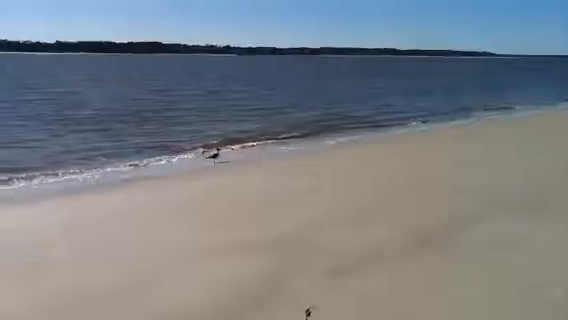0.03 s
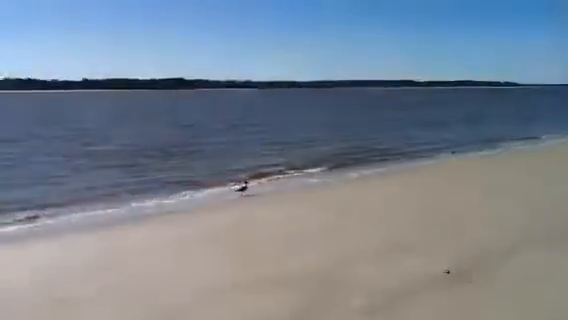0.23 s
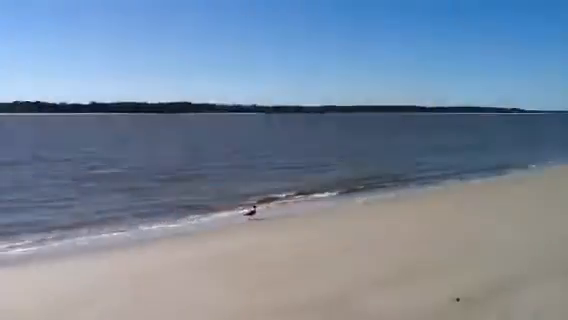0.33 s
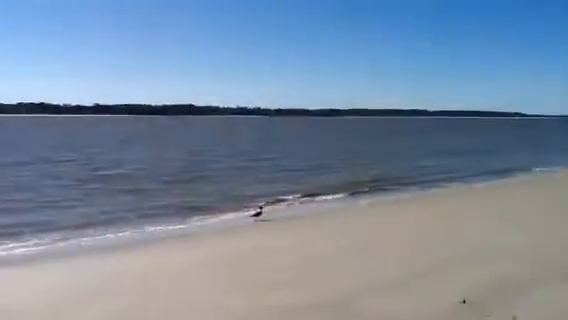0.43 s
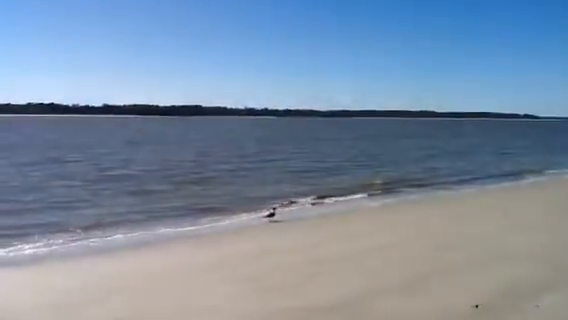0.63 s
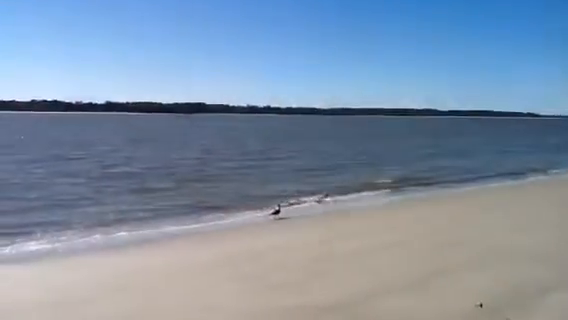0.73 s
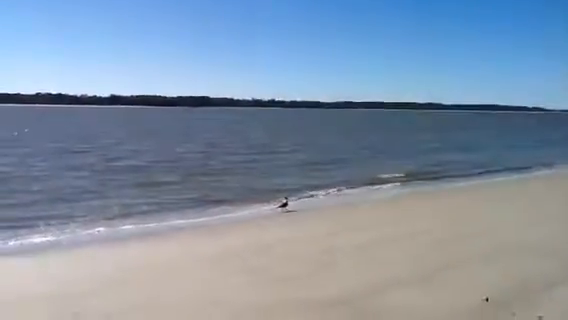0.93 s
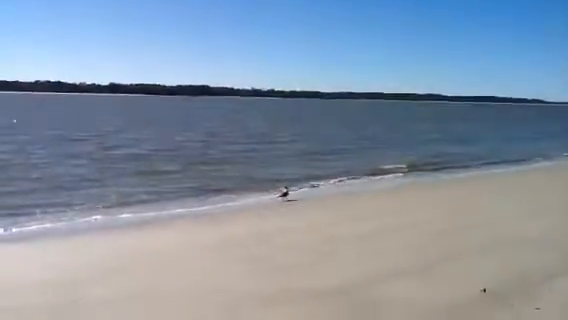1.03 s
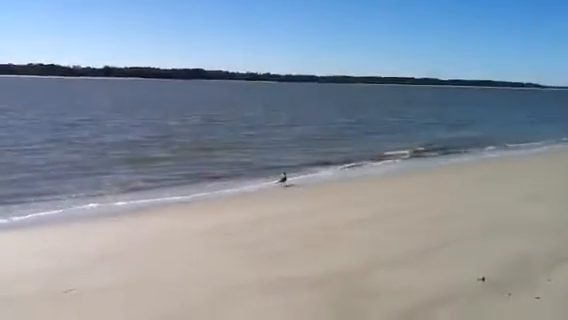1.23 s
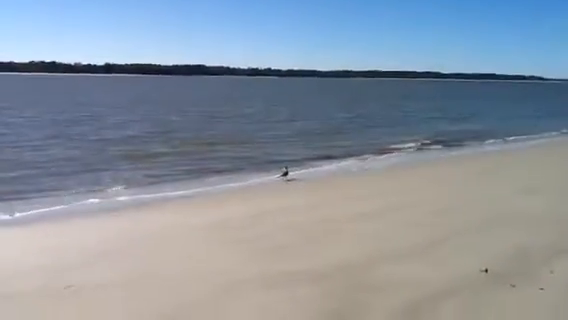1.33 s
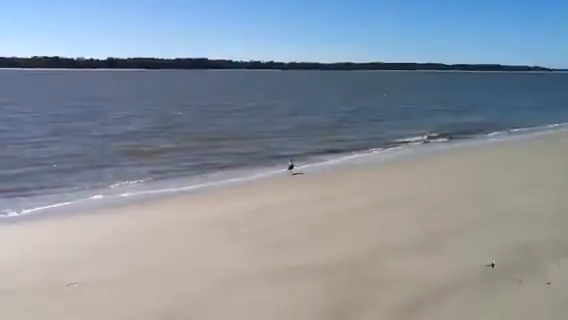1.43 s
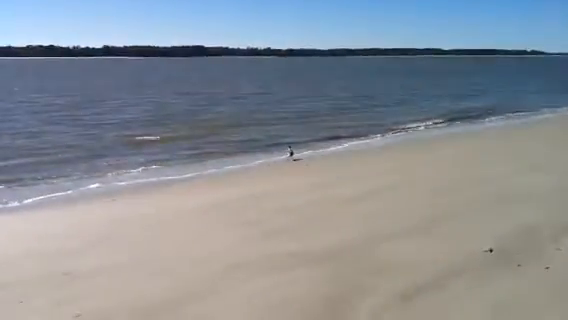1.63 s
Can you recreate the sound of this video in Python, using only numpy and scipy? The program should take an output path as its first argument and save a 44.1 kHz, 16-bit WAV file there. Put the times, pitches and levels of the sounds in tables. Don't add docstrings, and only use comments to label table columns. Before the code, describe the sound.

Wind buffets a handheld camera's microphone on an open beach: silence until 0.12 s, then loud, low, lumpy rumble, easing after 0.45 s and dropping around 0.8 s to weak puffs. Small surf hisses faintly throughout. A distant gull gives six short rising-falling calls from 0.5 s, about every quarter second, loudest at 1.7 s. Plastic ticks scatter throughout, with sharper cracks at 0.78 and 1.53 s.

```python
import sys
import numpy as np
from scipy import signal
from scipy.fft import rfft, irfft, next_fast_len
from scipy.io import wavfile
from scipy.ndimage import uniform_filter1d, map_coordinates

SR = 44100
rng = np.random.default_rng(int(sys.argv[2]) if len(sys.argv) > 2 else 0)


def store_wav(level_fs):
    pcm = np.round(np.clip(np.atleast_2d(level_fs), -1, 1) * 32767)
    wavfile.write(sys.argv[1], SR, pcm.T.astype(np.int16))


def linear_from_db(decibels):
    return 10 ** (np.asarray(decibels, float) / 20)


N = 74970


def unit(x):
    return x / np.sqrt(np.mean(x ** 2) + 1e-20)


def wobble(rate):
    return map_coordinates(rng.standard_normal(400), [np.arange(N) * rate / SR], mode="wrap")


def coloured(x, points):
    m = next_fast_len(N + 8192)
    hz, db = np.transpose(points)
    log_bins = np.log(np.fft.rfftfreq(m, 1 / SR) + 1)
    gain = linear_from_db(np.interp(log_bins, np.log(hz), db))
    return unit(irfft(rfft(x, m) * gain, m)[:N])


def grains(per_s, scatter_db):
    chance = rng.random(N)
    sign, size = rng.standard_normal((2, N))
    return (chance < per_s / SR) * sign * linear_from_db(scatter_db * size)


def even(x):
    span_s = .07
    power = uniform_filter1d(x ** 2, size=round(span_s * SR))
    power = uniform_filter1d(power, size=round(span_s * SR / 2))
    return x / np.sqrt(np.abs(power) + 1e-9)


def surf():
    # (frequency [Hz], level [dB per Hz])
    hiss_colour = [(250, -17), (500, 1), (1000, 2), (2000, -0.5), (3200, -8), (5000, -17), (8000, -23.5),
                   (15500, -31.5)]
    # (time [s], level [dB])
    swell = [(.12, 0.5), (.4, 0.5), (.65, 0), (.9, 0), (1.1, -1.5), (1.3, -1.5), (1.5, 0), (1.7, .5)]
    # (time [s], level over the hiss [dB], half length [s])
    wavelets = [
        (0.474, -18, 0.17),
        (.88, -18, 0.19),
    ]
    level_db, foam_per_s, foam_db, foam_hz = -45, 250, -69.5, 6060
    t = np.arange(N) / SR

    z = signal.stft(rng.standard_normal(N + 512), nperseg=512)[2]
    field = uniform_filter1d(rng.standard_normal(z.shape), size=8, axis=0)
    field = uniform_filter1d(field, size=10, axis=1)
    patchy = signal.istft(z * linear_from_db(1.04 * unit(field)), nperseg=512)[1][:N]
    hiss = coloured(patchy, hiss_colour)

    run_up = sum(linear_from_db(db) * np.exp(-((t - s) / half) ** 2) for s, db, half in wavelets)
    fizz_colour = [(2500, -28), (5000, -6), (7500, 3.5), (11000, -13), (15500, -8)]
    fizz = coloured(rng.standard_normal(N), fizz_colour)
    foam = coloured(grains(foam_per_s, 1.7), [(foam_hz / 4, -30), (foam_hz, 0), (15500, -8)])
    surf_level = linear_from_db(level_db + np.interp(t, *np.transpose(swell)))
    return surf_level * (hiss + run_up * fizz) + linear_from_db(foam_db) * foam


def gull():
    # (start [s], top [s], end [s], top pitch [Hz], level [dB])
    calls = [
        (.484, .548, .565, 898, -50),
        (.712, .797, .83, 1002, -51.5),
        (.955, 1.015, 1.056, 1032, -48),
        (1.163, 1.245, 1.288, 1024, -49.5),
        (1.392, 1.475, 1.538, 1028, -46),
        (1.656, 1.735, 1.8, 1015, -42),
    ]
    # (multiple of the pitch, level [dB])
    throat = [(1, -20), (2, 0), (3, -9.5), (4, -27), (5, -20), (6, -24)]
    facing = [-8, -5, -1, 4.5, -4, -10]
    rises = [.22, .15, .135, .145, .11, .085]
    falls = [.05, .12, .18, .22, .27, .26]
    attack_s, release_s, waver_share, flutter_db = .006, .008, .0015, .8
    swing, bend = 1.7, 2.2
    scoop, scoop_s = .06, .003
    close_db, push_db = -8, -1

    out, t = np.zeros(N), np.arange(N) / SR
    waver = waver_share * wobble(59.4)
    flutter = linear_from_db(flutter_db * np.array([wobble(40.5) for _ in throat]))
    for (s, top, end, hz, db), facing_db, rise, fall in zip(calls, facing, rises, falls):
        before = np.clip((top - t) / (top - s), 0, 1)
        after = np.clip((t - top) / (end - top), 0, 1)
        climb = rise * np.sin(np.pi / 2 * before) ** swing
        drop = fall * after ** bend
        slide = scoop * np.exp(-np.abs(t - s) / scoop_s)
        pitch = hz * (1 - climb - drop - slide + waver)
        phase = 2 * np.pi * np.cumsum(pitch) / SR
        beak_db = facing_db + close_db * (1 - before) ** 3
        voice = np.zeros(N)
        for (k, partial_db), partial_flutter in zip(throat, flutter):
            gain = linear_from_db(partial_db + beak_db * (k > 3.5))
            voice += gain * partial_flutter * np.sin(round(k) * phase)
        shape = np.clip((t - s) / attack_s, 0, 1) * np.clip((end - t) / release_s, 0, 1)
        out += linear_from_db(db + 0.5 + push_db * before) * shape * voice
    return out


def case_ticks():
    # (time [s], peak level [dB], centre [Hz], width [octaves])
    ticks = [(.1522, -42.5, 10400, 0.87), (.1635, -43, 7000, 1), (.1919, -44, 7000, 1),
             (.3702, -49, 8500, .8), (.387, -38, 4500, .35), (.387, -34, 8800, 1.2), (.4013, -42, 6100, .5),
             (.452, -39, 10200, .7), (0.53, -32.5, 2840, 0.34), (0.5307, -40, 5200, 0.89),
             (.5546, -41, 8950, 1.9), (.5926, -40, 4760, 0.42), (.5926, -49, 10500, .8),
             (.5985, -38, 2300, .4), (.6964, -41, 6300, .3), (.7396, -43, 6500, .45),
             (.7666, -52, 8000, .4), (0.7768, -33, 6430, 0.61), (.7788, -34, 2680, .9),
             (0.7828, -38, 6940, 0.45), (.849, -37, 8200, .7), (.8953, -34.5, 4100, 1.3),
             (.9162, -47, 9000, .9), (.9524, -47, 6000, 1.6), (1.0882, -38, 3800, 1.1),
             (1.1257, -49, 12500, .8), (1.1624, -47, 5860, .5), (1.1716, -44.5, 11500, .8),
             (1.224, -46, 8500, .7), (1.2367, -43, 4300, .45), (1.2367, -47, 10500, .7),
             (1.459, -46, 5000, .4), (1.5272, -30.5, 3620, 0.29), (1.5277, -34, 6200, 0.34),
             (1.5325, -30.5, 1730, 0.45), (1.5324, -33, 3600, 0.4), (1.591, -54, 6300, .9),
             (1.627, -54, 6800, .3), (1.665, -40.5, 4400, .4), (1.6652, -50, 8000, 1.2)]
    t60_s, onset_s = 0.0048, 0.00023
    out, t = np.zeros(N + 512), np.arange(512) / SR
    scatters = rng.standard_normal((len(ticks), 2, 11))
    for (s, db, hz, octaves), (detune, turn) in zip(ticks, scatters):
        modes_hz = hz * 2 ** (octaves * (np.linspace(-.62, .55, num=11) + 0.016 * detune))
        waves = np.sin(2 * np.pi * modes_hz[:, None] * t + 1.1 * turn[:, None])
        rings = (hz / modes_hz) @ waves
        decay = linear_from_db(-60 * t / t60_s * np.sqrt(hz / 6000))
        tick = rings * decay * (1 - np.exp(-t / onset_s))
        out[round(s * SR):][:512] += linear_from_db(db) * tick / np.abs(tick).max()
    return out[:N]


def case_crack():
    # (frequency [Hz], level [dB])
    shell = [(2300, -14), (3500, -6.5), (4400, -8), (5900, -1.5), (7600, 2), (8400, -3), (10500, -7),
             (13500, -16)]
    crack_s, crack_db, t60_s, onset_s = .7778, -29, .0075, 0.00014
    t = np.clip(np.arange(N) / SR - crack_s, 0, None)
    ring = np.zeros(N)
    for hz, db in shell:
        ring += linear_from_db(db - 60 * t / t60_s * hz / 6000) * np.sin(2 * np.pi * hz * t)
    return linear_from_db(crack_db) * (1 - np.exp(-t / onset_s)) * ring


def wind_puffs():
    # (centre [s], peak level [dB], frequency
    # [Hz])
    puff_table = [(0.125, -23, 610.0), (0.124, -16.5, 289.7), (0.163, -13, 180.8), (0.175, -19, 690.0),
                  (0.247, -18, 179.4), (0.262, -16.5, 230.0), (0.263, -26.0, 591), (0.287, -24, 230.0),
                  (0.314, -20, 220.0), (0.353, -20.5, 298.2), (0.355, -19, 160.0), (0.378, -25, 180.0),
                  (0.402, -22, 221.4), (0.44, -26.5, 544), (0.444, -20, 179), (0.527, -25.5, 242),
                  (0.575, -24, 289.4), (0.612, -33, 550.0), (0.623, -23.5, 241.4), (0.641, -22, 248.6),
                  (0.66, -30, 191), (0.678, -24.0, 270.0), (0.689, -34, 660.0), (0.718, -24, 270.0),
                  (0.735, -36, 513), (0.757, -34.5, 551), (0.758, -23.0, 199.6), (0.759, -47, 775),
                  (0.811, -26, 230.0), (0.925, -24.5, 190.0), (1.024, -25, 199.6), (1.048, -44, 530.0),
                  (1.114, -35.5, 299), (1.125, -37.5, 150.5), (1.141, -30.5, 150.0), (1.168, -39, 470.0),
                  (1.174, -35, 225), (1.183, -44, 435), (1.197, -41.5, 441.4), (1.203, -31.5, 220.8),
                  (1.224, -46.0, 690), (1.3, -36.5, 360.0), (1.305, -48, 867), (1.328, -48, 220.2),
                  (1.332, -45, 853), (1.356, -36.5, 436), (1.365, -28, 180.0), (1.391, -30, 180.0),
                  (1.445, -43.5, 560.0), (1.457, -32, 190.0), (1.493, -35.0, 200.0), (1.509, -42, 219.8),
                  (1.534, -50, 700.0), (1.544, -37, 150.2), (1.615, -37.5, 463), (1.614, -36.0, 280.0),
                  (1.621, -48, 890.0), (1.641, -35.5, 200.0), (1.654, -46.0, 744), (1.684, -35.5, 201.4),
                  (.232, -18, 280),
        (0.26, -21, 227),
        (.243, -23.5, 450),
        (.412, -20, 400),
        (.49, -33, 360),
        (0.36, -26.5, 480),
        (0.143, -20, 325),
        (0.24, -25, 330),
        (.398, -36, 1250),
        (.7, -31, 170),
    ]
    half_s, common_db = 0.0054, 1
    t = np.arange(N) / SR
    events = puff_table
    out = np.zeros(N)
    for (centre_s, db, hz), turn in zip(events, rng.random(len(events))):
        burst = np.exp(-((t - centre_s) / half_s) ** 2)
        out += linear_from_db(db + common_db) * burst * np.sin(2 * np.pi * (hz * t + turn))
    return out


def wind():
    # (time [s], strength [dB], extra turbulence at the port edge [dB])
    gust = [(.125, -23.5, 7), (.165, -19.5, 0), (.21, -22, 1), (.24, -19.5, 3), (.31, -24.5, 5),
            (.35, -22.5, -5), (.385, -23.5, 0.5), (0.404, -23.5, 7.5), (.425, -25, 2.5), (.45, -25.5, -2),
            (.62, -28.5, -4.5), (.76, -27.5, -2.5), (.82, -36, -2), (.89, -36, -2), (1.15, -38, -2),
            (1.36, -38.5, 1.5), (1.55, -43.5, 4.5), (1.7, -42, 4)]
    # (frequency [Hz], level [dB per Hz])
    port = [(25, -58), (55, -34), (120, -5), (190, 2), (300, -2.5), (500, -13.5), (900, -34.5), (2000, -68)]
    # (frequency [Hz], level [dB per Hz])
    edge = [(150, -24), (300, 1), (500, 0), (700, -3.5), (1000, -10.5), (1400, -19.5), (2200, -60),
            (4000, -68)]
    eddies_per_s, scatter_db, bed_db = 2000, 2, -2
    edge_level_db, edge_grows = -7.5, 1.222
    t = np.arange(N) / SR
    s, db, edge_db = np.transpose(gust)
    gust_db = np.interp(t, s, db)
    lump_db = 1.2 * wobble(35.04)

    big = coloured(grains(eddies_per_s, scatter_db), port)
    big = even(linear_from_db(lump_db + 0.87 * wobble(12.0)) * big)
    small = coloured(grains(3 * eddies_per_s, scatter_db), edge)
    small = even(linear_from_db(lump_db + 1.8 * wobble(59.9)) * small)
    small_db = db.max() + edge_grows * (gust_db - db.max()) + edge_level_db + np.interp(t, s, edge_db)
    return linear_from_db(gust_db + bed_db) * big + linear_from_db(small_db) * small + wind_puffs()


def scene():
    return (surf() + gull() + case_ticks() + case_crack() + wind())[None]


def low_pass(x):
    return signal.sosfilt(signal.butter(12, 15940, fs=SR, output="sos"), x)


def record(dry):
    # (frequency [Hz], level [dB])
    mic = [(20, 0), (14500, 0), (15200, -4), (15500, -14), (15800, -40), (16000, -90)]
    start_s, jolt_db, jolt_s, ceiling = .12038, -24, .0025, 0.6
    t = np.arange(N) / SR - start_s
    heard = coloured(dry[0], mic) * np.std(dry)
    heard = heard / (1 + np.abs(heard / ceiling) ** 4) ** (1 / 4)
    settle = np.exp(-np.abs(t) / jolt_s)
    heard = heard * (1 - settle) + linear_from_db(jolt_db) * settle
    return low_pass((heard * (t > 0))[None])


dry = scene()
out = record(dry)
store_wav(out)
```